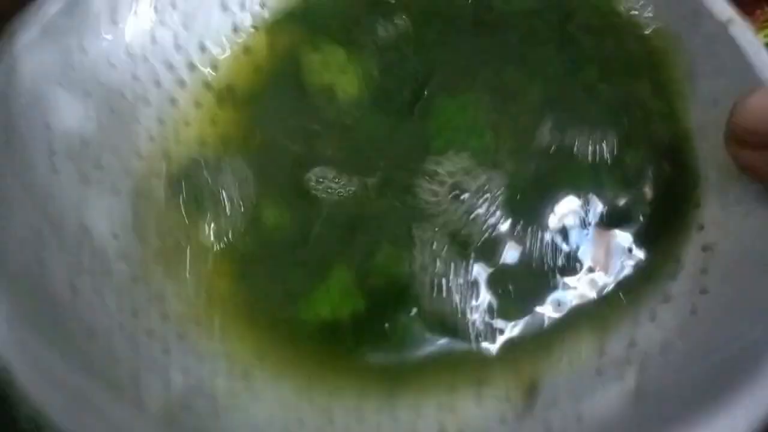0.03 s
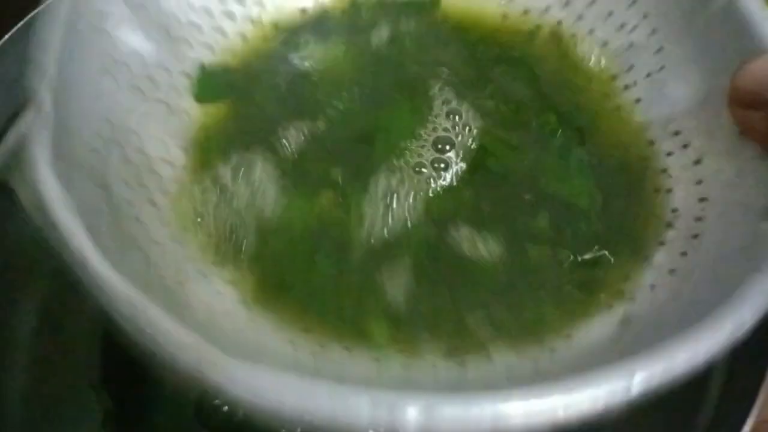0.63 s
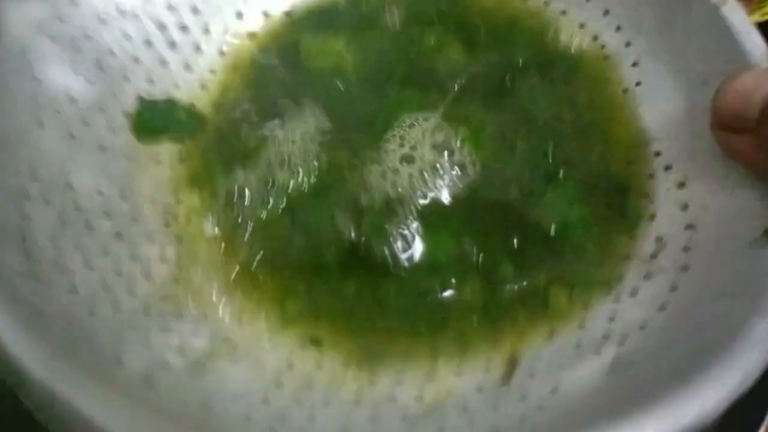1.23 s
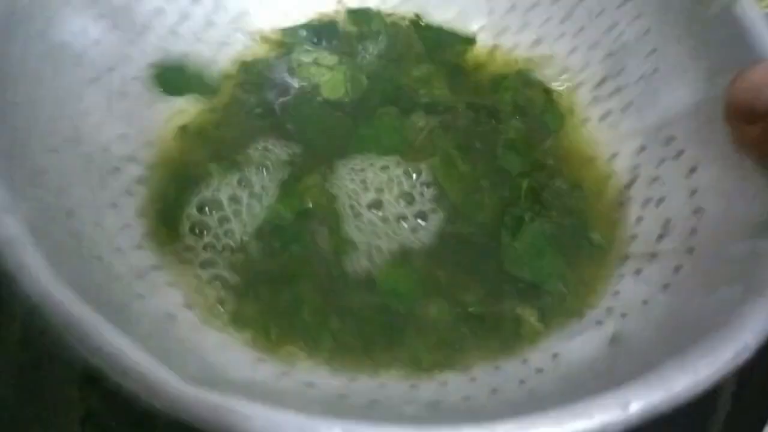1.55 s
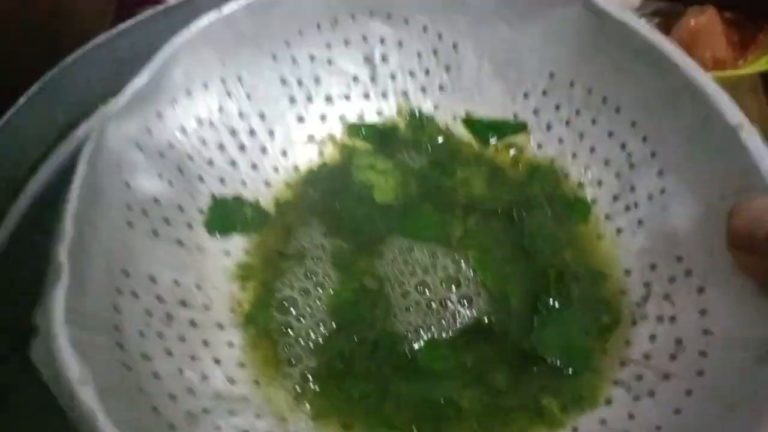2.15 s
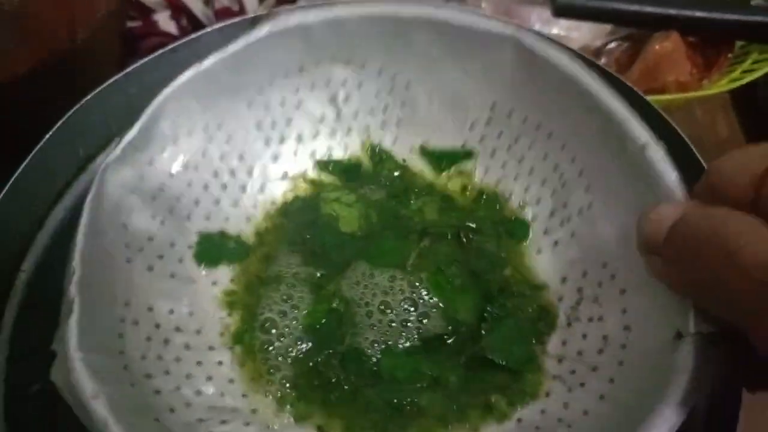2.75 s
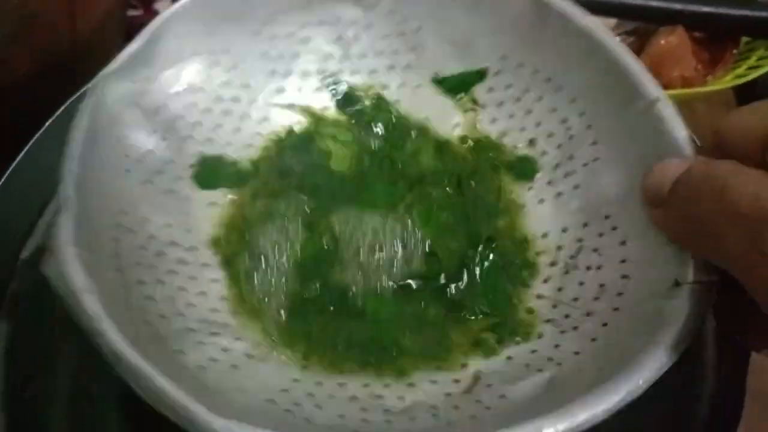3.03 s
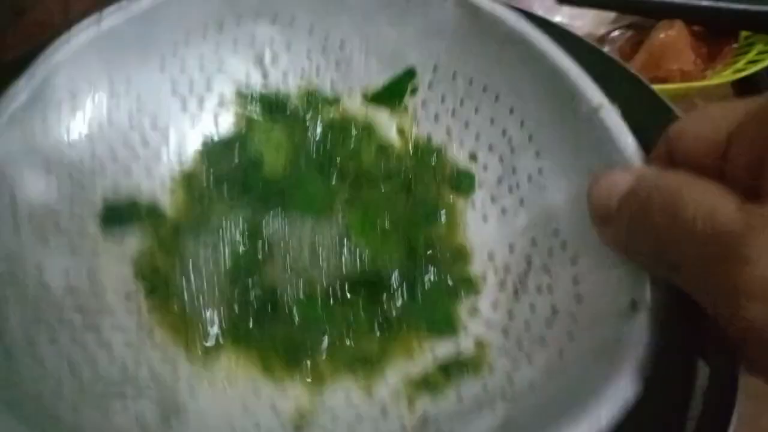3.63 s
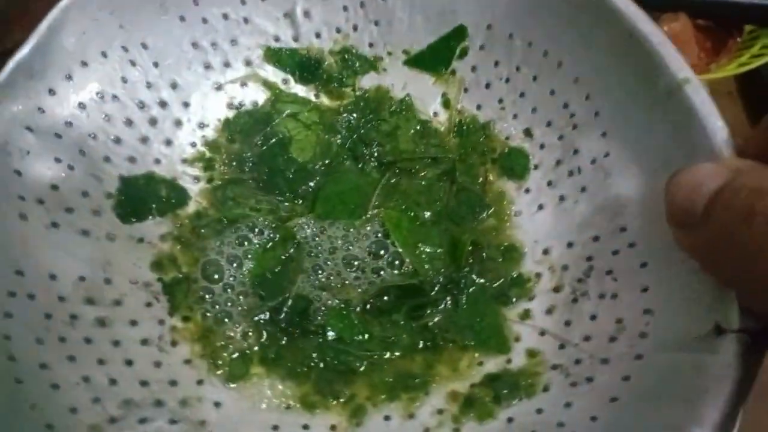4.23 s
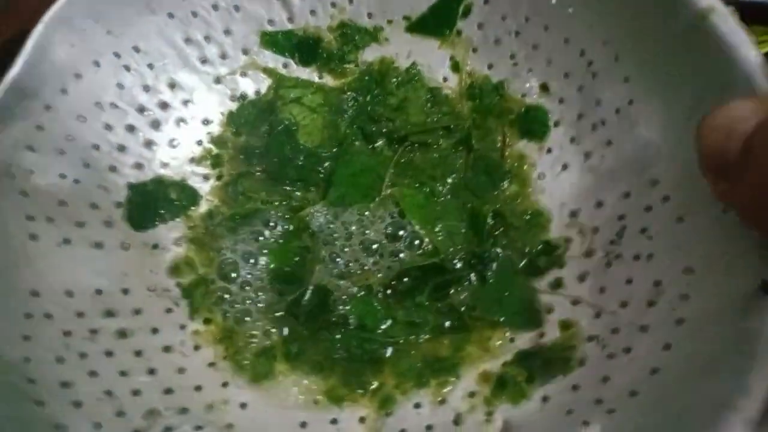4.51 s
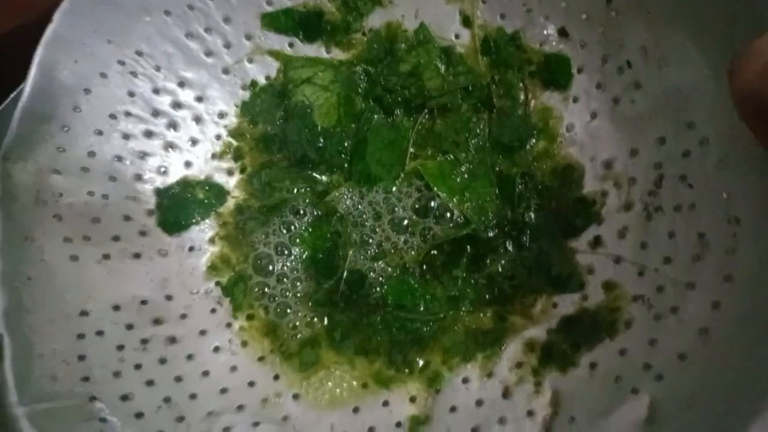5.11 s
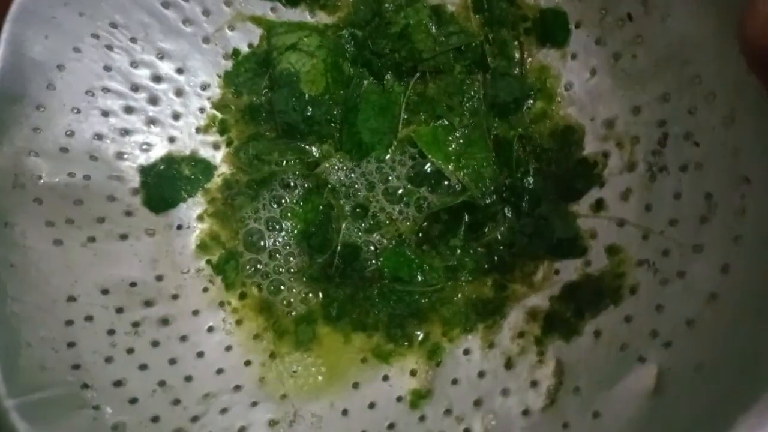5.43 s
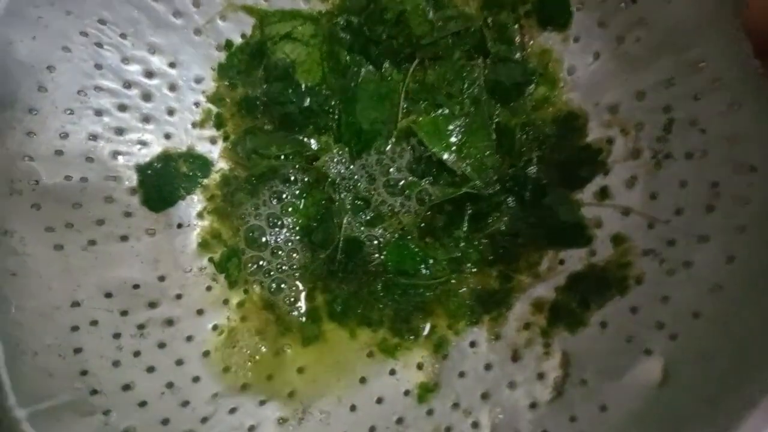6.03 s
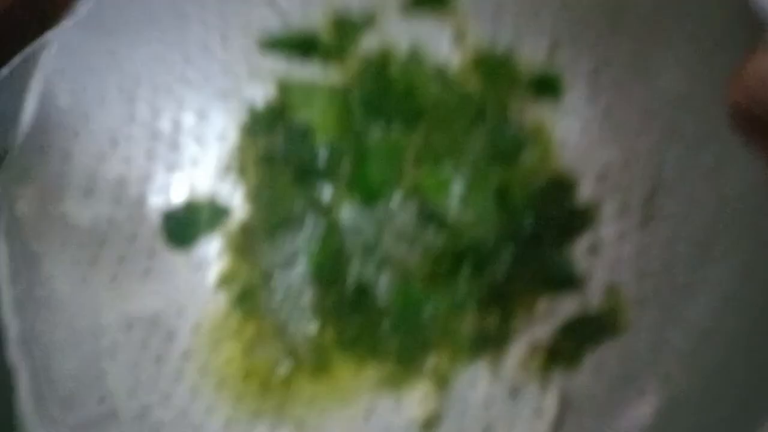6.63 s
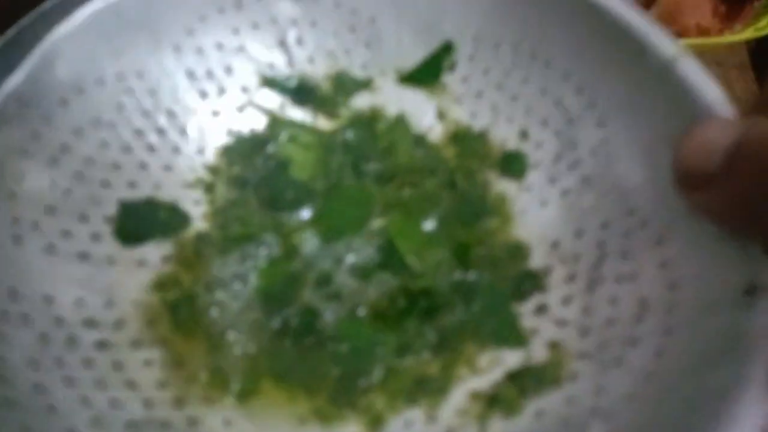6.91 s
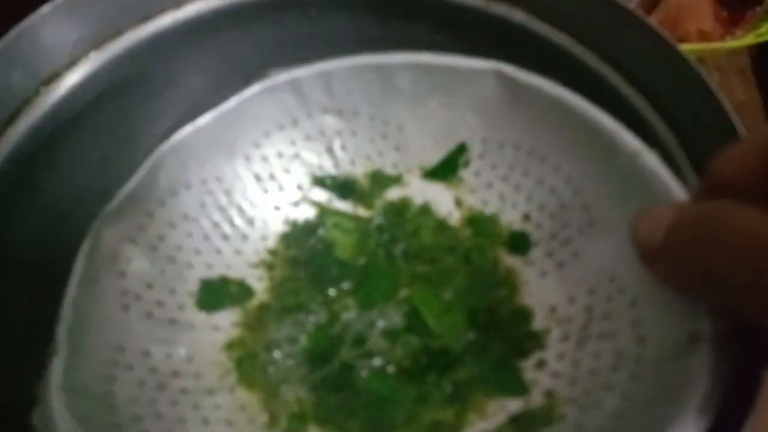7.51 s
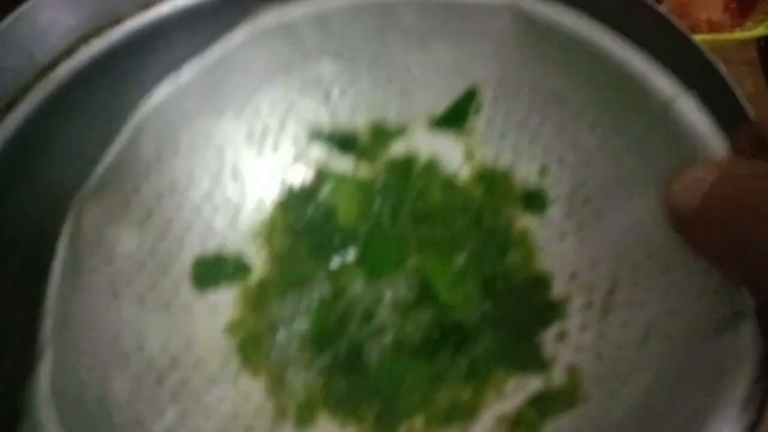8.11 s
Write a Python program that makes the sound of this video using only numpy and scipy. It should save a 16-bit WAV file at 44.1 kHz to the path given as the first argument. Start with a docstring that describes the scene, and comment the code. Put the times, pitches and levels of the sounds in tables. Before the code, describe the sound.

Liquid drains from chopped herbs through a perforated metal strainer into a part-filled pot. At first the drops fall thickly, with sharp little splashes, bright bubble plinks, small glugs and a fine fizzing spatter, while the pot rings faintly along. The trickle then turns lighter and uneven and ends in a few single drips. A hand briefly rubs the wet metal. It is heard close up, with a low kitchen hum behind.

```python
"""Liquid drains from chopped herbs through a perforated metal strainer into a part-filled pot.
Each drop slaps the surface; many trap an air bubble that rings and rises in pitch as it surfaces.
Heavy gobs open cavities that glug, and fine spatter fizzes. The trickle thins to single drips.
The pot rings along, a hand rubs the strainer, and a kitchen hums low behind."""
import sys
import numpy as np
from scipy import signal
from scipy.fft import rfft, irfft
from scipy.io import wavfile

SR = 44100
rng = np.random.default_rng(int(sys.argv[2]) if len(sys.argv) > 2 else 0)


def dump(signal):
    """Clip the signal to [-1, 1] and save it as 16-bit WAV at the path in sys.argv[1]."""
    limited = np.clip(np.atleast_2d(signal).T, -1, 1)
    pcm = np.round(limited * 32767).astype(np.int16)
    wavfile.write(sys.argv[1], SR, pcm)


N = 368676
TIME = np.arange(N) / SR
LIGHT_THUD_DB = -23  # thud of a light drop, relative to its slap

# surface slap spectrum: freq_hz, gain_db
SLAP_COLOUR = [(1000, -20), (1500, -11), (1930, -14), (2070, 6), (2400, -1), (2750, 8.5), (3100, -4),
               (3400, 3), (4100, -6), (5200, -36.5)]
# spray tick spectrum: freq_hz, gain_db
SPRAY_COLOUR = [(3000, -36), (4600, -12.5), (5700, 0.5), (6500, 3), (7400, -3.5), (8300, -13), (9800, -13),
                (11500, -29.5), (13200, -35), (15000, -18), (16500, -41.5)]


def drops():
    """Heavy gobs splash and leave a cavity that glugs; light drops only splash."""
    # heavy gobs: start_s, cavity_hz, thud_db, slap_db, spray_db
    gobs = [(0.079, 730, -41, -29.5, -40), (0.124, 486, -36.5, -38.5, -41), (0.218, 704, -38.5, -37, -41),
            (0.311, 493, -43, -28, -26.5), (0.372, 1150, -41.5, -27.5, -35.5),
            (0.477, 670, -45.5, -33, -42), (0.567, 550, -35, -33, -34.5), (0.658, 538, -30, -33.5, -39.5),
            (0.729, 554, -42, -29, -24), (0.989, 856, -35.5, -33.5, -28.5), (1.054, 1110, -39, -30, -26.5),
            (1.257, 714, -35.5, -36.5, -36.5), (1.36, 796, -44, -26.5, -30.5),
            (1.423, 566, -39.5, -37, -31), (1.78, 663, -35, -29, -25.5), (1.925, 528, -42, -26.5, -35.5),
            (1.976, 863, -39, -33, -43), (2.078, 568, -31, -48, -31.5), (2.22, 706, -45, -39.5, -44),
            (2.994, 840, -38.5, -41, -50), (3.208, 583, -34, -34, -31), (3.323, 1350, -43.5, -44.5, -37.5),
            (3.377, 847, -40, -34.5, -44), (3.573, 535, -37.5, -36.5, -38), (3.758, 1156, -36.5, -35, -39),
            (3.961, 770, -35.5, -35.5, -50), (4.273, 800, -39, -43.5, -58),
            (4.303, 1000, -40.5, -41, -42.5)]
    # light drops: start_s, slap_db, spray_db
    light_drops = [(0.135, -33.5, -34.5), (0.402, -31, -38), (0.797, -31.5, -41), (0.896, -49, -25),
                   (1.077, -37, -28.5), (1.137, -35, -40), (1.151, -33.5, -36.5), (1.19, -56, -34),
                   (1.314, -21, -47), (1.504, -45, -52), (1.548, -43.5, -39.5), (1.603, -38, -28.5),
                   (1.812, -40, -33), (1.877, -29.5, -41), (2.006, -36, -49), (2.125, -43, -39.5),
                   (2.25, -37, -69), (2.304, -48, -54), (2.712, -46, -46), (2.76, -48, -43),
                   (2.89, -45, -72), (2.92, -40.5, -47), (3.06, -46.5, -69), (3.085, -44.5, -39.5),
                   (3.406, -40, -53), (3.484, -43, -47.5), (3.593, -57, -39.5), (3.709, -38.5, -30.5),
                   (3.789, -37.5, -50), (4.201, -43.5, -53), (4.248, -43, -39), (4.528, -27, -42.5),
                   (4.979, -46.5, -35), (5.075, -30.5, -46), (5.096, -56.5, -43.5), (5.206, -44, -72),
                   (5.27, -47, -53.5), (5.304, -32, -47), (5.575, -42, -54), (5.697, -36, -52),
                   (5.77, -40, -48), (5.995, -40, -53), (6.214, -46.5, -72), (6.448, -39.5, -66),
                   (6.549, -47, -47.5), (6.632, -48, -45), (6.763, -42.5, -74), (6.839, -47, -70),
                   (7.343, -63, -46.5), (7.692, -83.5, -59.5), (8.002, -49, -60)]
    out = np.zeros(N)
    for start_s, cavity_hz, thud_db, slap_db, spray_db in gobs:
        # the push divides into a dull knock and the cavity tone
        add(out, start_s, splash(thud_db - 1.5, slap_db, spray_db))
        add(out, start_s, undb(thud_db + 6.5) * bubble(cavity_hz, decay_ms=4.96, rise_hz_per_ms=2))
    for start_s, slap_db, spray_db in light_drops:
        add(out, start_s, splash(slap_db + LIGHT_THUD_DB, slap_db, spray_db))
    return out


def splash(thud_db, slap_db, spray_db):
    """A drop pushes into the pool, slaps the surface and throws spray."""
    # pool thud spectrum: freq_hz, gain_db
    thud_colour = [(200, -20.5), (330, -12), (420, -1.5), (550, -9.5), (780, -1.5), (930, -16),
                   (1120, -1.5), (1400, -22), (2000, -13)]
    thud = undb(thud_db + 1.5) * burst(thud_colour, decay_s=0.023, snap=0.32, tint_db=4.5)
    slap = undb(slap_db + 4) * burst(SLAP_COLOUR, decay_s=0.0083, snap=0.76, tint_db=8.0)
    spray = undb(spray_db - 0.28) * burst(SPRAY_COLOUR, decay_s=0.0041, snap=0.56, tint_db=0.5)
    return thud + slap + spray


def burst(colour, decay_s, snap, tint_db, size=2600):
    """Sharp contact, then a dying crackle of torn liquid; random tint, energy of 10 ms at rms 1."""
    t = np.arange(size) / SR
    push = rng.standard_normal(size) * undb(7.4 * rng.standard_normal(size)) * np.exp(-t / decay_s)
    push /= np.linalg.norm(push)
    push[0] += snap
    tinted = [(hz, db + tint_db * rng.standard_normal()) for hz, db in colour]
    crackle = through(push, response(tinted))
    return crackle / np.linalg.norm(crackle) * np.sqrt(SR / 100)


def plinks(gain_db=4.0, slap_db=-20, tick_db=-25, climb_per_decay=0.01):
    """Large bubbles give the drips their pitch; each pinches off with a faint slap and tick."""
    # trapped bubbles: start_s, pitch_hz, level_db, decay_ms
    trapped = [(0.006, 3090, -19.5, 1.7), (0.29, 2700, -25.5, 3), (0.312, 2670, -14, 1.8),
               (0.336, 2626, -27, 6.6), (0.431, 3250, -20, 2.5), (0.796, 2060, -36, 5),
               (0.829, 1985, -32, 5.6), (0.894, 2680, -20.5, 3.7), (0.917, 6580, -19.5, 1.2),
               (1.051, 2777, -26.5, 6.2), (1.078, 3480, -13.5, 0.46), (1.137, 2110, -31, 4.1),
               (1.312, 2670, -25.5, 19), (1.358, 2650, -28, 3.9), (1.501, 2630, -26, 4.5),
               (1.523, 2710, -12, 2.4), (1.779, 3690, -20.5, 1.8), (1.876, 2830, -17, 1.5),
               (1.892, 3330, -21, 4.4), (1.924, 2700, -20, 4.4), (1.927, 1870, -18, 1.2),
               (2.056, 3630, -26.5, 2.3), (2.245, 2725, -28.5, 10), (2.385, 3100, -39, 2.3),
               (2.434, 3570, -41.5, 5.6), (2.67, 2770, -36, 0.6), (2.761, 3550, -29.5, 3.2),
               (2.888, 2923, -27.5, 3.4), (3.107, 5860, -29, 2.8), (3.21, 5730, -27, 2.6),
               (3.38, 3620, -36, 18), (3.484, 2290, -27, 2.8), (3.524, 2830, -34.5, 4),
               (3.592, 3670, -28.5, 4), (3.619, 2704, -27, 6.8), (3.711, 6830, -25, 2.2),
               (3.806, 2670, -30, 3.8), (3.973, 3930, -28.5, 1.9), (3.999, 3000, -15.5, 2.2),
               (4.004, 5510, -26, 1.8), (4.051, 3496, -25, 1.4), (4.201, 4300, -31, 1.8),
               (4.314, 2757, -28.5, 6.9), (4.362, 2320, -27, 2.2), (4.369, 2480, -29.5, 5.2),
               (4.528, 2860, -37.5, 8.9), (4.913, 7260, -28, 0.58), (5.074, 2597, -30, 6.5),
               (5.27, 2757, -30, 8.7), (5.305, 2900, -26.5, 11), (5.407, 2760, -36.5, 13.7),
               (5.574, 1470, -37.5, 4.7), (5.594, 2756, -35, 9.8), (5.64, 2050, -34, 3.9),
               (5.697, 2127, -35.5, 15.5), (5.807, 2140, -33.5, 3), (5.997, 5800, -37, 3.9),
               (6.036, 2087, -29.5, 10.2), (6.316, 2825, -29.5, 1.8), (6.366, 2756, -22, 3.9),
               (6.486, 2770, -40.5, 6.2), (6.63, 2075, -30.5, 6.3), (7.336, 3256, -33, 3.5),
               (7.437, 3330, -42, 2.9), (7.463, 3400, -42, 3.8), (8.221, 2076, -32, 6)]
    out = np.zeros(N)
    for start_s, pitch_hz, level_db, decay_ms in trapped:
        ring = bubble(pitch_hz, decay_ms, climb_per_decay * pitch_hz / decay_ms, swell=0.64)
        pinch = splash(level_db + slap_db + LIGHT_THUD_DB, level_db + slap_db, level_db + tick_db)
        add(out, start_s, undb(level_db + gain_db) * ring)
        add(out, start_s, pinch)
    return out


def chirps(gain_db=1, climb_per_decay=0.16):
    """Longer chirps are bubbles gliding upward; the shortest are the sharp clicks of a splash."""
    # rising chirps: start_s, pitch_hz, level_db, decay_ms
    rising_chirps = [(0.373, 2600, -16.5, 1.1), (0.412, 2350, -19, 2.7), (0.569, 3280, -22, 1.7),
                     (0.785, 1885, -29, 7.9), (1.282, 2450, -19.5, 1.8), (1.719, 2430, -24, 3.3),
                     (1.857, 2470, -26, 5.5), (2.055, 2680, -20, 2.2), (2.078, 2450, -19.5, 1.3),
                     (2.303, 2400, -28.5, 3.1), (2.445, 2520, -35.5, 3), (2.919, 1790, -24, 3),
                     (3.207, 2380, -24.5, 1.4), (3.376, 1973, -24.5, 5.8), (3.87, 3200, -39, 3.2),
                     (3.981, 1954, -24, 9), (4.002, 3710, -18.5, 0.89), (4.098, 2180, -33, 6),
                     (4.129, 2750, -31, 3.5), (4.302, 2000, -24, 3.1), (4.529, 1586, -21.5, 2.9),
                     (4.618, 2230, -41, 7.4), (5.303, 2574, -21, 3), (5.408, 1950, -26, 2.2),
                     (5.591, 1267, -32, 5.7), (6.366, 2620, -23, 1.4)]
    out = np.zeros(N)
    for start_s, pitch_hz, level_db, decay_ms in rising_chirps:
        chirp = bubble(pitch_hz, decay_ms, climb_per_decay * pitch_hz / decay_ms, swell=0.42)
        add(out, start_s, undb(level_db + gain_db) * chirp)
    return out


def bubble(start_hz, decay_ms, rise_hz_per_ms, swell=0.94):
    """Damped sine that climbs in pitch, as a ringing bubble does near the surface; peak 1."""
    t_ms = np.arange(int(7 * decay_ms * SR / 1000) + 8) * 1000 / SR
    envelope = (1 - np.exp(-t_ms / (swell * decay_ms))) * np.exp(-t_ms / decay_ms)
    pitch_hz = np.minimum(start_hz + rise_hz_per_ms * t_ms, SR / 4)
    return envelope / envelope.max() * np.sin(2 * np.pi * np.cumsum(pitch_hz) / SR)


def spatter(stirred, trickle_end_s=6.85):
    """Thin threads from the holes, and droplets thrown up by each splash, keep the pool fizzing."""
    # fine flow between the drops: time_s, body_db, spray_db
    flow_levels = [(0, -43.5, -42), (.35, -36, -48), (.6, -41.5, -48.5), (1.13, -37.5, -46.5),
                   (1.45, -41, -42.5), (2.05, -56.5, -61), (2.55, -59, -60.5), (3.0, -70, -57),
                   (3.78, -59, -58), (4.35, -39.5, -60.5), (4.8, -75, -67.5), (5.35, -38.5, -61),
                   (5.72, -47, -60.5), (6.2, -48, -65), (6.75, -53.5, -54.5), (6.92, -62, -67.5)]
    time_s, body_db, spray_db = np.transpose(flow_levels)
    body_flow = undb(np.interp(TIME, time_s, body_db) - 5.5)
    spray_flow = undb(np.interp(TIME, time_s, spray_db) - 3.5)
    fizz = swarm(pitch_hz=2573, spread=0.205, cycles=12, climb_per_decay=0.02, scatter_db=6.5, count=1500)
    froth = swarm(pitch_hz=5200, spread=0.19, cycles=5, climb_per_decay=0.02, scatter_db=6, count=1600)
    gurgle = swarm(pitch_hz=822, spread=0.317, cycles=1.1, climb_per_decay=0.033,
                   scatter_db=3.5, count=500)
    body = undb(-1.5) * fizz + undb(-4) * patter(SLAP_COLOUR, per_s=350, scatter_db=8)
    spray = undb(-3) * froth + undb(-7) * patter(SPRAY_COLOUR, per_s=420, scatter_db=10.5)
    churn = undb(np.interp(TIME, [2.1, 4.8], [-8, -17])) * gurgle
    body_gain = np.hypot(body_flow, undb(-14.5) * stirred)
    spray_gain = np.hypot(spray_flow, undb(-35) * stirred)
    running = np.interp(TIME, [trickle_end_s, 7.0], [1, 0.25])  # the threads break off
    return running * (body_gain * body + body_flow * churn + spray_gain * spray)


def agitation(splashes, rise_s=0.0041, settle_s=0.018):
    """The surface stirs just after each splash, then settles; a running rms."""
    t = np.arange(SR // 2) / SR
    memory = (1 - np.exp(-t / rise_s)) ** 2 * np.exp(-t / settle_s)
    return np.sqrt(np.abs(through(splashes ** 2, memory / memory.sum())))


def swarm(pitch_hz, spread, cycles, climb_per_decay, scatter_db, count):
    """Small bubbles at random moments; smaller ones ring higher and shorter; rms 1."""
    out = np.zeros(N)
    starts_s = (np.arange(count) + rng.uniform(0, 1.8, count)) * N / SR / count
    draws = np.clip(rng.standard_normal((count, 3)), -2, 2)
    for start_s, (detune, strength, sweep) in zip(starts_s, draws):
        hz = pitch_hz * np.exp(spread * detune)
        decay_ms = 1000 * cycles / hz
        rise_hz_per_ms = climb_per_decay * abs(sweep) * hz / decay_ms
        add(out, start_s, undb(scatter_db * strength) * bubble(hz, decay_ms, rise_hz_per_ms))
    return unit(out)


def patter(colour, per_s, scatter_db):
    """Tiny impacts at random moments; rms 1."""
    hits = rng.random(N) < per_s / SR
    strength = undb(scatter_db * np.clip(rng.standard_normal(N), -2, 2))
    polarity = rng.choice([-1, 1], N)
    return unit(through(hits * strength * polarity, response(colour)))


def pot(direct, t60_s=0.19, size=22000):
    """Sound bounces between pool and strainer, rings the pot and spills into the kitchen."""
    # modes of the pot and its air: freq_hz, level_db
    modes = [(417, -2), (533, 2), (786, -41.5), (890, -28), (1088, -25), (1175, -3.5), (1471, -4.5),
             (1792, -8.5), (2053, 1.5), (2195, -21), (2520, -9), (2715, -5.5), (2795, -6.5), (2975, -17),
             (3352, -12)]
    t = np.arange(size) / SR
    damping_per_s = np.log(1000) / t60_s
    tones = sum(undb(db) * np.cos(2 * np.pi * hz * t) for hz, db in modes)
    ring = 2 * damping_per_s / SR * np.exp(-damping_per_s * t) * tones
    inside = echoes(t60_s=0.042, colour=[(3000, 6), (15000, 2)], onset_s=0.00022)
    room = echoes(t60_s=0.32, colour=[(800, -1.5), (3000, -14.5), (15000, -8)], onset_s=0.0027)
    return direct + through(direct, undb(1) * ring + undb(-9) * inside + undb(-19) * room)


def echoes(t60_s, colour, onset_s, size=22000):
    """Dense dying reflections; mean gain 1 over 2-4 kHz."""
    t = np.arange(size) / SR
    envelope = (1 - np.exp(-(t / onset_s) ** 2)) * np.exp(-np.log(1000) * t / t60_s)
    tail = through(rng.standard_normal(size) * envelope, response(colour))
    return tail / np.abs(rfft(tail)[size // 22:size // 11]).mean()


def rubs():
    """Skin slides on wet metal: a soft hiss over a dull rumble."""
    # grip shifts on the strainer: start_s, length_s, rumble_db, hiss_db
    grip_shifts = [(1.177, 0.081, -50, -78), (6.313, 0.13, -50.5, -48), (6.666, 0.08, -72, -53)]
    out = np.zeros(N)
    rumble = patter([(80, -29), (140, 1), (240, -2), (450, -2)], per_s=3000, scatter_db=-8)
    hiss_colour = [(300, -0.5), (1600, -3.5), (3500, -10), (8000, -23), (12000, -36.5)]
    hiss = patter(hiss_colour, per_s=3300, scatter_db=3)
    for start_s, length_s, rumble_db, hiss_db in grip_shifts:
        progress = np.clip((TIME - start_s) / length_s, 0, 1)
        stroke = np.sqrt(np.abs(np.sin(np.pi * progress ** 0.61)))
        out += stroke * (undb(rumble_db) * rumble + undb(hiss_db) * hiss)
    return out


def kitchen(rush_db=-56.48, drift_hz=1.114):
    """A low steady rush with a few wavering hum lines."""
    # room noise spectrum: freq_hz, density_db
    rush_colour = [(18, -49.5), (30, -38.5), (48, -6.5), (165, -3.5), (328, -5.5), (404, -8.5),
                   (540, -12.5), (1280, -19.5), (2060, -21), (2350, -16.5), (7090, -31.5), (11100, -44.5),
                   (16000, -60.5)]
    # hum lines: freq_hz, level_db
    hum_lines = [(99.9, -66.5), (163, -66.5), (484.5, -67), (533, -67), (2099, -73)]
    rush = unit(through(rng.standard_normal(N), response(rush_colour, size=8192)))
    hum = np.zeros(N)
    for freq_hz, level_db in hum_lines:
        gain = undb(level_db + 2 * wander(7.6))
        phase = 2 * np.pi * np.cumsum(freq_hz + drift_hz * wander(4.6)) / SR
        hum += gain * unit(np.sin(phase))
    return rush * undb(rush_db + 0.2 * wander(4)) + hum


def wander(rate_hz):
    """Slow random drift, spread near 1."""
    knots = rng.standard_normal(int(N / SR * rate_hz) + 2)
    return np.interp(TIME * rate_hz, np.arange(len(knots)), knots)


def response(colour, size=1024):
    """Minimum-phase impulse response from (freq_hz, gain_db) points."""
    hz, db = np.transpose(colour)
    octave = np.log2(np.maximum(np.fft.rfftfreq(size, 1 / SR), 1))
    octaves_outside = np.abs(octave - np.clip(octave, np.log2(hz[0]), np.log2(hz[-1])))
    gain = undb(np.interp(octave, np.log2(hz), db) - 20 * np.minimum(octaves_outside, 2))
    cepstrum = irfft(np.log(gain))[:size // 2]
    cepstrum[0] /= 2
    return irfft(np.exp(rfft(2 * cepstrum, size)))


def through(x, impulse_response):
    """Filter x, keeping its length."""
    return signal.fftconvolve(x, impulse_response)[:len(x)]


def add(out, start_s, x):
    """Mix x into out at start_s."""
    i = int(np.clip(start_s * SR, 0, N - 1))
    out[i:i + len(x)] += x[:N - i]


def undb(db):
    """Decibels to gain."""
    return 10 ** (np.asarray(db) / 20)


def unit(x):
    """Scale to rms 1."""
    return x / np.sqrt(np.mean(x ** 2) + 1e-20)


def scene():
    """Drops, bubbles and spatter in the pot, the hand on the strainer, and the kitchen; mono."""
    splashes = drops() + plinks() + chirps()
    liquid = splashes + spatter(agitation(splashes))
    return (pot(liquid) + rubs() + kitchen())[None, :]


def record(dry):
    """Steep elliptic low-pass."""
    cutoff_hz = 16300
    return signal.sosfilt(signal.ellip(8, 0.2, 70, cutoff_hz, fs=SR, output="sos"), dry)


dry = scene()
out = record(dry)
dump(out)
```